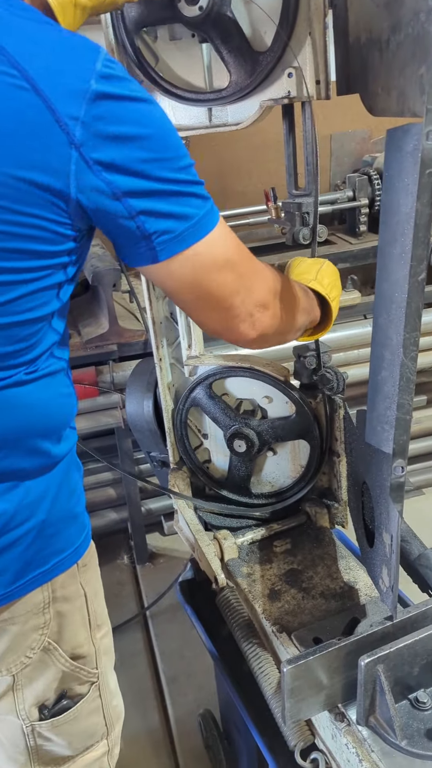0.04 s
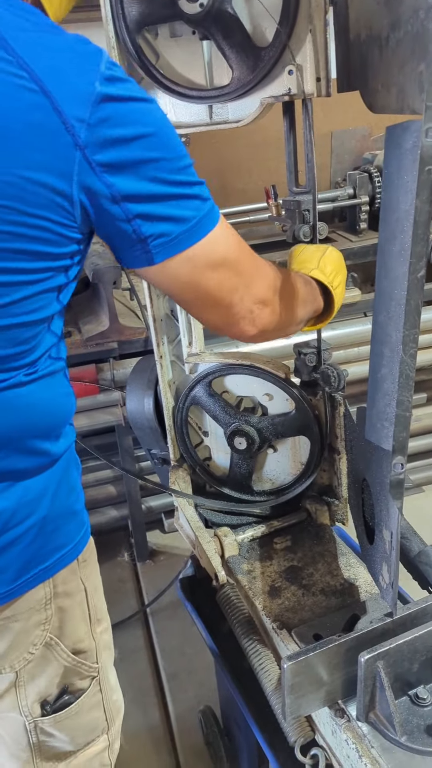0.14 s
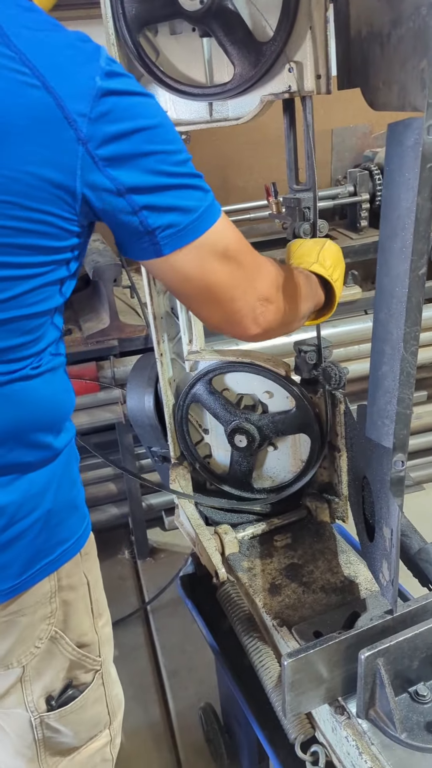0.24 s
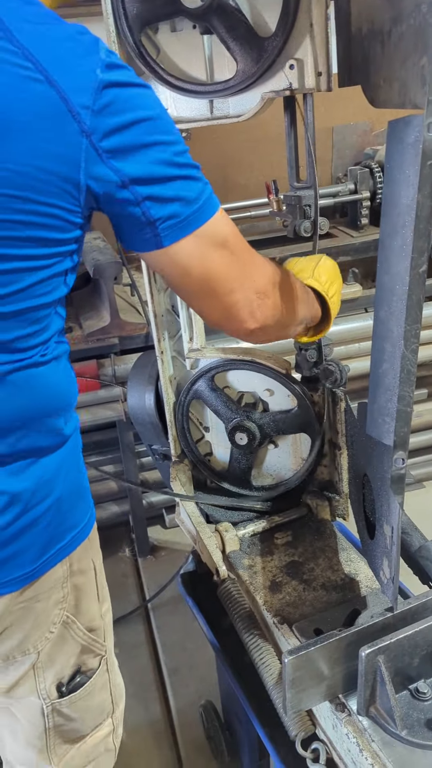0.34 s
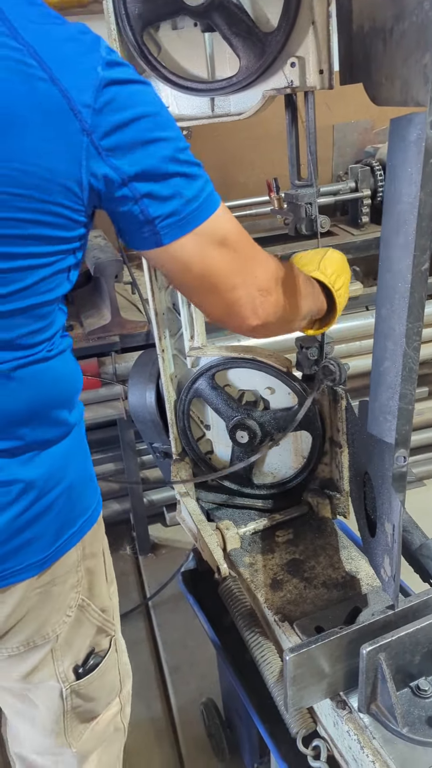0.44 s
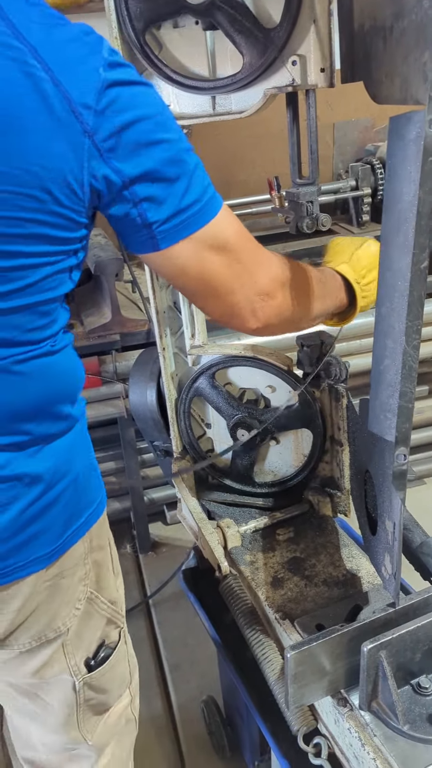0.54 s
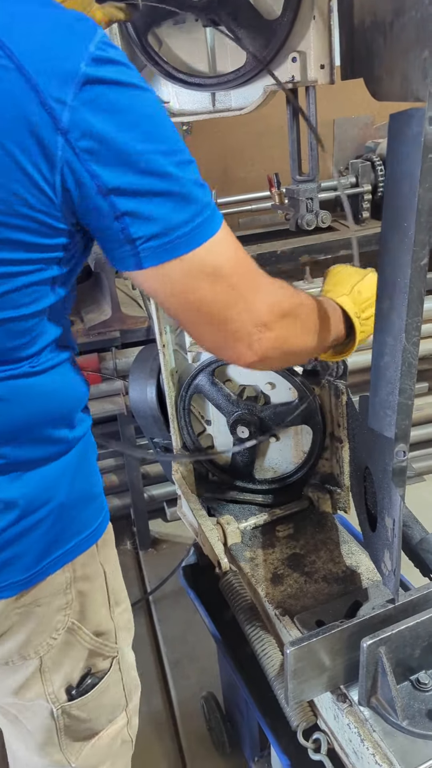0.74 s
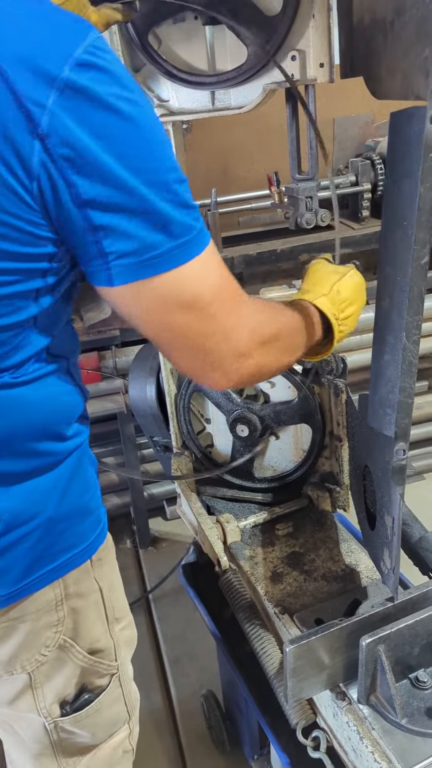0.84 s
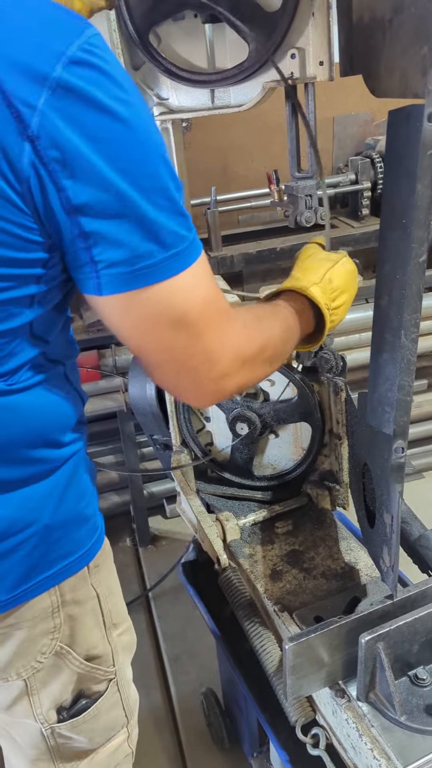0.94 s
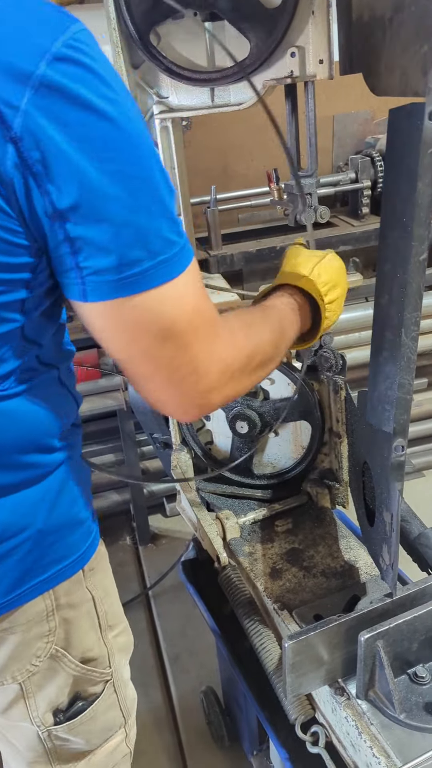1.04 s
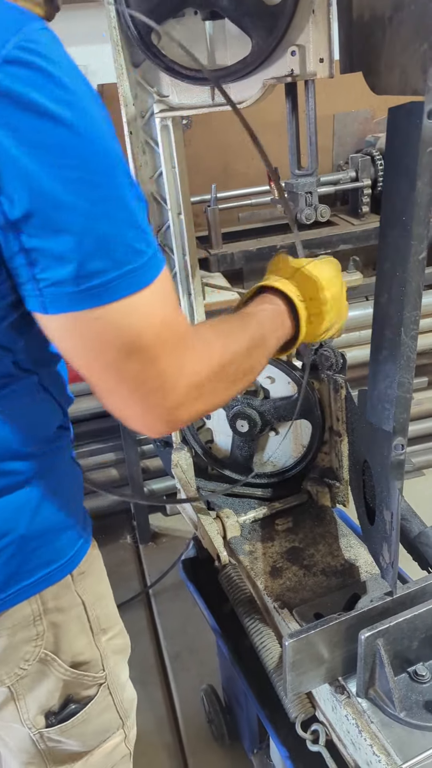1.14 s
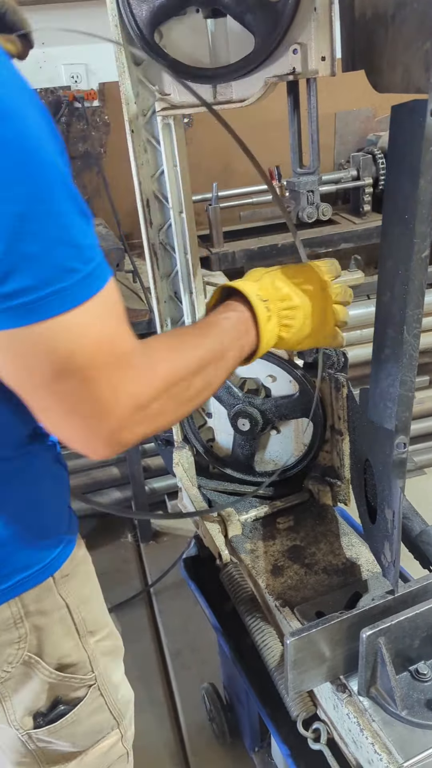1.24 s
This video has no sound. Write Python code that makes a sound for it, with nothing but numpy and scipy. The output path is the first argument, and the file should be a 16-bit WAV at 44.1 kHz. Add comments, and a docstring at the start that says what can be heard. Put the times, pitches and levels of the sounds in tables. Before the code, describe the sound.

Saw blade teeth scrape on metal in short tugs, snapping free with a sharp clack.

```python
"""A rasp comes first: the teeth of a long steel band-saw blade scrape over the guides as it is pulled
off its wheels by hand, in several pulls. The teeth catch a few times, the blade's back drags on a tyre,
and the blade snaps free with one sharp clack. The steel rings thinly and hums as it sticks and slips,
and the loose loop wobbles with a low rumble. The workshop's ventilation runs behind it all."""
import sys
import numpy as np
from scipy import signal
from scipy.io import wavfile
from scipy.ndimage import uniform_filter1d

SR = 44100
rng = np.random.default_rng(int(sys.argv[2]) if len(sys.argv) > 2 else 0)


def to_wav(sig):
    """Store sig (one row per channel, or 1-D mono) as 16-bit WAV at the path in sys.argv[1].

    Samples outside -1..1 are clipped; the rate is SR.
    """
    pcm = np.clip(np.atleast_2d(sig), -1, 1) * 32767
    pcm = np.round(pcm).astype(np.int16)
    wavfile.write(sys.argv[1], SR, pcm.T)  # frames by channels


N = 57330
T = np.arange(N) / SR

# how hard the teeth rub: (time [s], level [dB], brightness [dB per octave])
RUB_CURVE = [(.12, -105, 9), (.172, -61, -4), (.184, -47, -6.5), (.198, -43.5, -4.5), (.252, -44, -1),
             (.28, -56.5, -2), (.315, -58, -4.5), (.336, -45.5, -2), (.36, -49.5, 1), (.392, -38, 2),
             (.411, -26.5, 0.9), (.433, -37.5, 2.1), (.445, -38, -.5), (.49, -43.5, -1), (.52, -40.5, 2),
             (.553, -39, -4.4), (.571, -31.5, -0.5), (.583, -40, -2), (.61, -32.5, 1.5), (.64, -30.5, 1),
             (.675, -51, -7.2), (.71, -33, 1.5), (.765, -36.5, -.5), (.80, -45.5, -1.5),
             (.845, -51.5, -6.5), (.86, -36.5, -0.8), (.89, -41.5, 2.5), (.918, -45.5, -2.5),
             (.95, -62, -4), (1.04, -69, -6), (1.095, -55, -6), (1.16, -83.5, -2), (1.3, -85, -13)]
# tone of the rubbing: (frequency [Hz], level [dB])
RUB_TONE = [(150, -14.5), (350, -5), (700, -1), (1250, -2), (1600, 5), (2200, 3.5), (2700, 0.5), (3400, 1),
            (4300, -2), (6300, 1), (8300, -7.5), (10000, -2.5), (12500, -6.5), (15000, -4.5)]
# a tooth catches and skids: (time [s], level [dB], length [s], brightness [dB per octave])
TOOTH_CATCHES = [(0.13, -84, 0.0093, 8), (0.1768, -46.5, .006, -4), (0.188, -63.5, 0.0086, 16.5),
                 (0.217, -57, 0.0096, 15.5), (.5855, -28, 0.0029, -4.5), (0.5931, -19, 0.0035, 0.8),
                 (0.6233, -41, 0.0043, 10), (0.845, -36.5, 0.0022, 3)]
# the blade's back drags over the wheel's tyre: (time [s], level [dB])
DRAG_CURVE = [(.172, -98), (.192, -48.5), (.255, -47), (.29, -56), (.37, -50), (.41, -42), (.46, -45),
              (.54, -48), (.595, -39), (.635, -43), (.70, -52), (.84, -56.5), (.865, -43.5), (.905, -51),
              (.94, -77)]
# tone of the dragging: (frequency [Hz], level [dB])
DRAG_TONE = [(150, -12), (300, 0), (410, 3.5), (620, 2), (1100, -1), (2000, -9), (4000, -17.5),
             (15000, -49.5)]
# the blade hits the frame and bounces: (time [s], level [dB])
SNAP_HITS = [(0.7024, 3), (.7038, 1.5), (.7061, -5.5), (.7125, -7.5)]
# tone of the snap: (frequency [Hz], level [dB])
SNAP_TONE = [(60, -44.5), (200, -31), (700, -18), (1150, -19.5), (1550, 7.5), (2300, 5), (3300, 7.5),
             (4500, 2.5), (5600, -1.5), (7800, -0.5), (11000, -4), (15000, -6)]
# pitches the steel rings at: (frequency [Hz], level [dB], time to fade by 60 dB [s])
BLADE_PITCHES = [(1490, 1, .2), (1576, -5, .22), (1831, -1, .2), (1986, -4, .18), (2256, -5, .22),
                 (2560, -5, .14), (2686, -3, .17), (3140, -2, .15), (3419, 3, .15), (3968, -7, .25),
                 (6250, -3, .12), (8978, 0, .13), (9820, -2, .16), (12156, -2, .16), (13600, 2, .13),
                 (14550, 1, .1)]
# notes of the flexing blade:
# (peak time [s], frequency [Hz], level [dB], rise [s], time to fade by 60 dB [s], glide [Hz per s])
FLEX_NOTES = [(.224, 14600, -40, .006, 0.11, 0), (.235, 245, -48.5, 0.069, 0.56, 93),
              (.385, 258, -52, 0.13, 0.2, 0), (0.425, 3340, -36, .008, .08, 0),
              (.434, 2006, -32.5, .006, 0.039, -2), (.571, 1517, -33.5, 0.0078, 0.057, 0),
              (.575, 227.5, -47, .04, 0.96, -120), (.596, 1080, -36, 0.005, 0.038, 8),
              (.597, 524, -41, 0.014, 0.058, 0), (.60, 1573, -33, 0.014, 0.26, 6),
              (.62, 331, -40, 0.0264, 0.41, -480), (.635, 140.2, -41.5, 0.03, 0.42, -49),
              (.765, 139.4, -49, 0.055, 0.14, 156), (.868, 879, -44, 0.038, 0.11, 6.5),
              (.87, 554, -49, 0.031, 0.17, 5), (.89, 231.8, -50, 0.094, 0.28, -4),
              (.892, 2103, -42, 0.043, 0.23, 0), (.905, 2207, -48, 0.039, 0.46, 3.5),
              (.895, 3240, -51, 0.015, 0.32, 0), (.91, 2965, -52.5, 0.014, 0.46, -9)]
# how much the loose loop sways: (time [s], level [dB])
SWAY_CURVE = [(.16, -77), (.20, -63), (.28, -48), (.34, -57), (.42, -49.5), (.48, -48.5), (.55, -49),
              (.61, -41), (.66, -51.5), (.71, -46.5), (.78, -47), (.83, -54.5), (.89, -68), (.97, -61),
              (1.3, -65.5)]
# low pitches of the bending loop: (frequency [Hz], level [dB], time to fade by 60 dB [s])
LOOP_PITCHES = [(129, 3, 0.18), (158.2, 0.5, 0.12), (215.2, 3.5, 0.12), (248.4, 1.5, 0.34),
                (293.5, -11, 0.05), (332.2, 1, 0.17), (505, -3, 0.24)]
# the room's echo: (frequency [Hz], time to fade by 60 dB [s])
ROOM_FADE = [(150, 0.38), (1500, 0.34), (5000, 0.5), (14000, 0.16)]
# how much louder the echo is on the left: (frequency [Hz], left minus right [dB])
ECHO_BALANCE = [(250, -7), (550, 1.5), (1100, -1), (2300, 0), (4400, -2.5), (8000, 3.5), (14000, 0.6)]
# how alike left and right are: (frequency [Hz], likeness [0 = unrelated, 1 = the same])
SIDE_LIKENESS = [(60, 0.97), (150, 1), (280, 0.95), (500, 0.46), (1000, 0), (4000, 0.0), (15000, 0.0)]
# tone of the ventilation: (frequency [Hz], level [dB])
AIR_TONE = [(30, -33), (45, -13), (70, 7.5), (110, -1.5), (180, -0.5), (250, -2), (340, -7.5), (520, -1),
            (800, -8), (1300, -3), (2000, -6), (3000, -13.5), (4500, -25), (6500, -32), (9000, -52),
            (15000, -45)]

EDGES_HZ = np.geomspace(22, 17000, 29)
# bands about a third of an octave wide: (centre [Hz], share of all frequencies [0 to 1], filter)
BANDS = [(np.sqrt(lo * hi), 2 * (hi - lo) / SR, signal.butter(2, [lo, hi], "band", fs=SR, output="sos"))
         for lo, hi in zip(EDGES_HZ, EDGES_HZ[1:])]
SIDES = np.array([[1], [-1]])  # plus for left, minus for right
FADE_60_DB = np.log(1000)  # exp(-FADE_60_DB) is a drop of 60 dB


def scraping():
    """The teeth rasp over a steel guide; harder rubbing is brighter."""
    level_db, brightness = over_time(RUB_CURVE)
    return friction(from_db(level_db), brightness, RUB_TONE)


def catches(low_cut_hz=560):
    """Each catching tooth makes a short, steep burst of friction with little bass."""
    out = 0
    for start, db, length, brightness in TOOTH_CATCHES:
        age = np.maximum(T - start, 0) / (length / 2)  # the burst peaks at age 1
        force = from_db(db) * age * np.exp(1 - age)
        out = out + friction(force, brightness, RUB_TONE, grains_per_s=12000)
    return signal.sosfilt(signal.butter(3, low_cut_hz, "high", fs=SR, output="sos"), out)


def snap(chatter_s=0.0011):
    """The blade hits the frame in quick bounces; each hit chatters and dies at once."""
    force = 0
    for start, db in SNAP_HITS:
        burst = rng.choice([-1, 1], N) * (T >= start) * np.exp(-np.maximum(T - start, 0) / chatter_s)
        force = force + from_db(db) * burst / np.linalg.norm(burst)
    return sum((-1) ** k * from_db(at_hz(SNAP_TONE, hz)) * signal.sosfilt(band, force)
               for k, (hz, _, band) in enumerate(BANDS))


def dragging():
    """The back of the blade rubs dully over the wheel's tyre."""
    return friction(from_db(over_time(DRAG_CURVE)[0]), 0, DRAG_TONE)


def blade_ring(contact, gain_db=-48.5):
    """Every contact sets the steel ringing; each pitch reaches left and right with its own delay."""
    out = 0
    delays = rng.integers(0, 60, (len(BLADE_PITCHES), 2))  # in samples
    for (hz, db, fade_s), pair in zip(BLADE_PITCHES, delays):
        tone = from_db(gain_db + db) * ring(contact, hz, fade_s)
        out = out + np.array([np.pad(tone, (delay, 0))[:N] for delay in pair])
    return out


def flex_notes(pan_db=-2.0):
    """The blade sticks and slips: notes swell, glide as the tension changes, and die away."""
    out = 0
    for peak_s, hz, db, rise_s, fade_s, glide in FLEX_NOTES:
        phase, coin_toss = rng.random(2)
        age = T - peak_s
        swell = np.clip(age / rise_s + 1, 0, 1) ** 2
        fade = np.exp(-FADE_60_DB * np.maximum(age, 0) / fade_s)
        cycles = hz * age + glide * age ** 2 / 2 + phase
        # higher notes are further out of step between left and right
        apart = np.arccos(at_hz(SIDE_LIKENESS, hz)) * np.sign(coin_toss - .5)
        tone = np.sin(2 * np.pi * cycles + apart * SIDES / 2)
        out = out + from_db(db + pan_db * SIDES / 2) * swell * fade * tone
    return out


def loop_rumble(width_db=-11, pan_db=-1.2, smooth_s=0.07):
    """The pull keeps the loose loop bending, so it rumbles at its low pitches."""
    def even_rumble():
        rumble = sum(from_db(db) * unit_level(ring(np.diff(rng.standard_normal(N + 1)), hz, fade_s))
                     for hz, db, fade_s in LOOP_PITCHES)
        return rumble / np.sqrt(uniform_filter1d(rumble ** 2, int(smooth_s * SR)) + 1e-6)
    sway = from_db(over_time(SWAY_CURVE)[0] + pan_db * SIDES / 2)
    return sway * (even_rumble() + from_db(width_db) * even_rumble() * SIDES)


def workshop(sound, direct_db=-11, frame_db=-3, frame_fade_s=0.039, room_db=-8):
    """A sound arrives directly, with quick echoes from the saw's frame and longer ones from the room."""
    echo = 0
    for hz, _, band in BANDS:
        power = 0
        for db, fade_s in ((frame_db, frame_fade_s), (room_db, at_hz(ROOM_FADE, hz))):
            fall = FADE_60_DB / fade_s
            power = power + from_db(db) ** 2 * 2 * fall / SR * np.exp(-2 * fall * T)
        balance = from_db(at_hz(ECHO_BALANCE, hz) * SIDES / 2)
        echo = echo + stereo_noise(hz, band) * np.sqrt(power) * balance
    return from_db(direct_db) * sound + signal.fftconvolve(sound[None], echo, axes=1)[:, :N]


def ventilation(level_db=-52):
    """The workshop's air makes a steady, dull rush."""
    rush = sum(from_db(at_hz(AIR_TONE, hz)) * stereo_noise(hz, np.vstack([band, band]))
               for hz, _, band in BANDS)
    return from_db(level_db) * unit_level(rush)


def friction(force, brightness, tone, grains_per_s=1800, pivot_hz=4000):
    """Tiny collisions follow the force; more brightness lifts what is above the pivot, lowers the rest."""
    out, power = 0, 0
    streams = [grains(grains_per_s) * force for _ in range(2)]  # the bands use these in turn
    for k, (hz, share, band) in enumerate(BANDS):
        gain = from_db(at_hz(tone, hz))
        octaves = np.log2(max(hz, pivot_hz / 10) / pivot_hz)
        if hz > 100:
            out = out + gain * from_db(brightness * octaves) * signal.sosfilt(band, streams[k % 2])
        power += gain ** 2 * share
    return out / np.sqrt(power)


def grains(per_s, spread_db=4.5):
    """Teeth and rough edges collide at random, making clicks of uneven size."""
    sizes = from_db(spread_db * np.minimum(rng.exponential(1, N), 4))
    signs = rng.choice([-1, 1], N)
    return unit_level(sizes * signs * (rng.random(N) < per_s / SR))


def ring(push, hz, fade_s):
    """Each push starts a pure tone that fades away."""
    decay, turn = np.exp(-FADE_60_DB / (fade_s * SR)), 2 * np.pi * hz / SR
    return signal.lfilter([0, np.sin(turn)], [1, -2 * decay * np.cos(turn), decay ** 2], push + 1e-18)


def stereo_noise(hz, band):
    """One band of noise for left and right, alike in the bass."""
    shared, opposite = signal.sosfilt(band, rng.standard_normal((2, N + SR // 4)))[:, -N:]
    alike = at_hz(SIDE_LIKENESS, hz)
    return (np.sqrt(1 + alike) * shared + np.sqrt(1 - alike) * opposite * SIDES) / np.sqrt(2)


def from_db(db):
    """Turn decibels into a number to multiply by."""
    return 10 ** (np.asarray(db) / 20)


def unit_level(sound):
    """Scale a sound to an average power of 1."""
    return sound / np.sqrt(np.mean(sound ** 2) + 1e-20)


def over_time(table):
    """Join a table's points with straight lines: one curve for each column after the time."""
    times, *columns = np.transpose(table)
    return [np.interp(T, times, column) for column in columns]


def at_hz(table, hz):
    """Read a table at one frequency, with octaves evenly spaced."""
    frequencies, values = np.transpose(table)
    return np.interp(np.log(hz), np.log(frequencies), values)


def scene(rub_ring_db=-9):
    """Each contact gets its own echoes; the blade rings, hums and rumbles over the ventilation."""
    upper, lower = scraping() / np.sqrt(2), scraping() / np.sqrt(2)  # the two guides
    teeth, clack = catches(), snap()
    contacts = sum(workshop(sound) for sound in (upper, lower, teeth + dragging(), clack))
    # rubbing damps the blade, so it rings less than after the snap
    ringing = blade_ring(clack + from_db(rub_ring_db) * (upper + lower + teeth))
    return contacts + ringing + loop_rumble() + flex_notes() + ventilation()


def record(dry, cutoff_hz=15800):
    """Cut off the highest treble steeply."""
    return signal.sosfilt(signal.ellip(12, .3, 80, cutoff_hz, fs=SR, output="sos"), dry)


dry = scene()
out = record(dry)
to_wav(out)
```